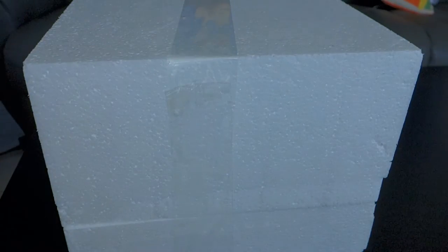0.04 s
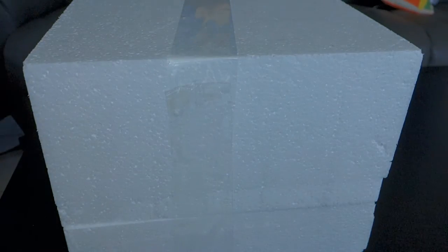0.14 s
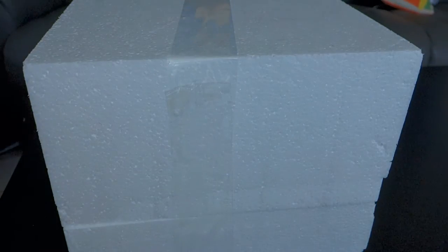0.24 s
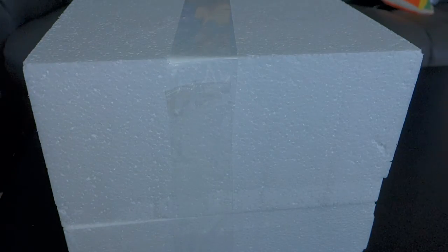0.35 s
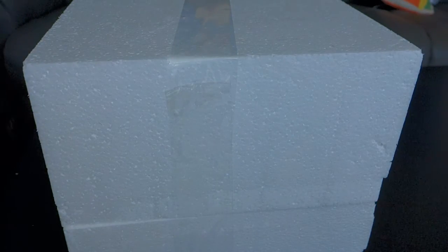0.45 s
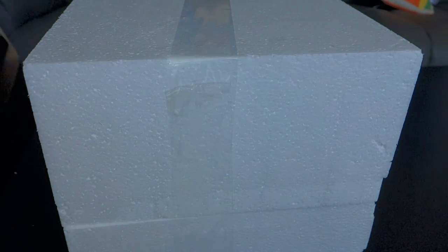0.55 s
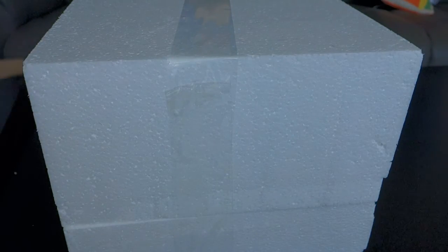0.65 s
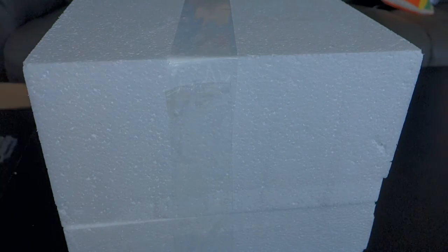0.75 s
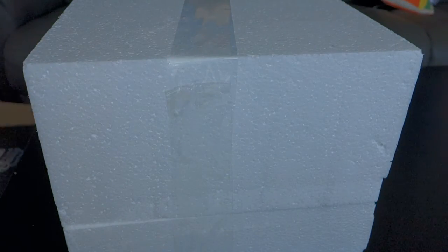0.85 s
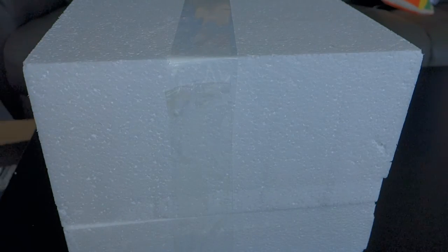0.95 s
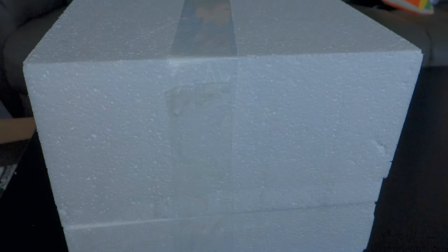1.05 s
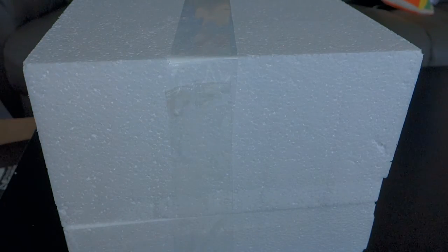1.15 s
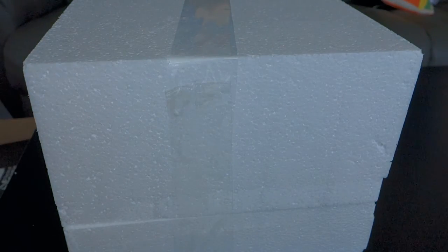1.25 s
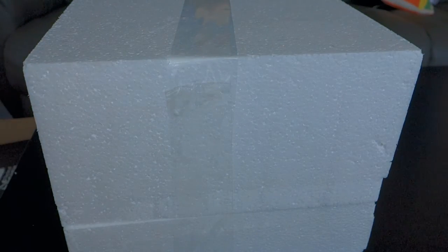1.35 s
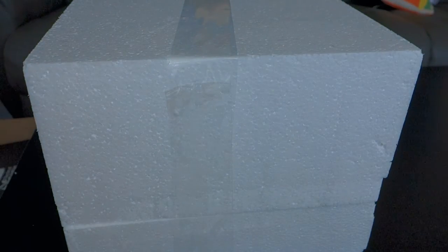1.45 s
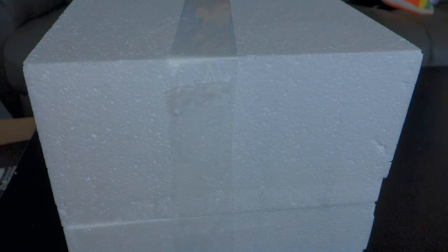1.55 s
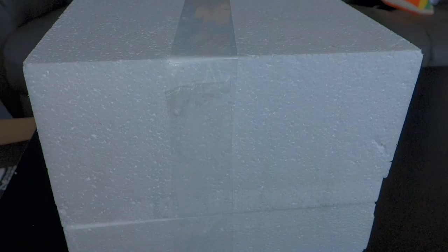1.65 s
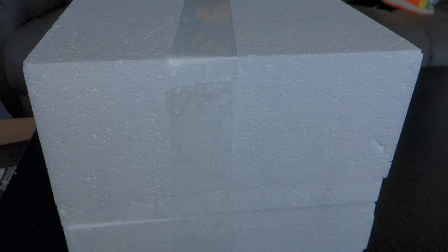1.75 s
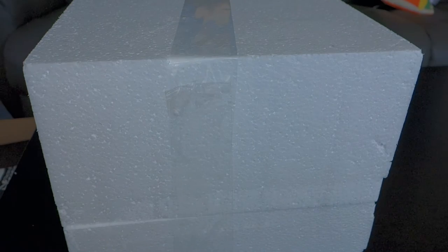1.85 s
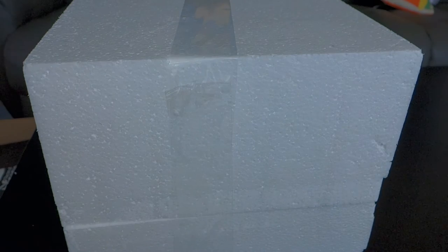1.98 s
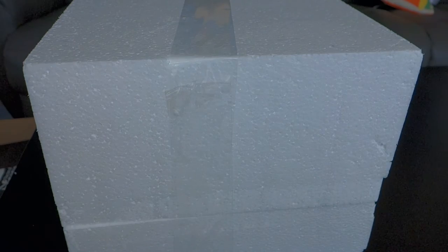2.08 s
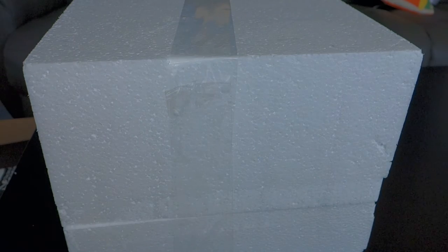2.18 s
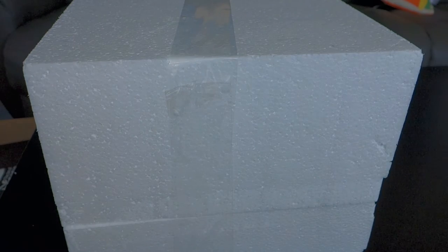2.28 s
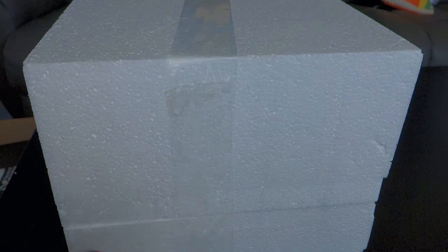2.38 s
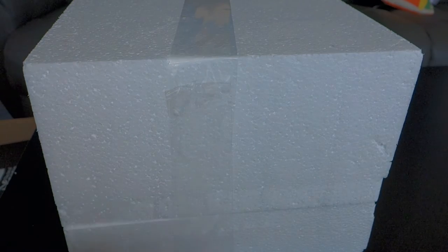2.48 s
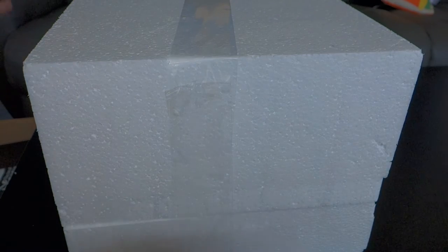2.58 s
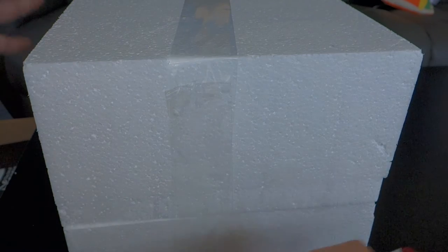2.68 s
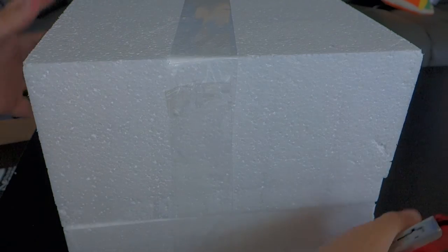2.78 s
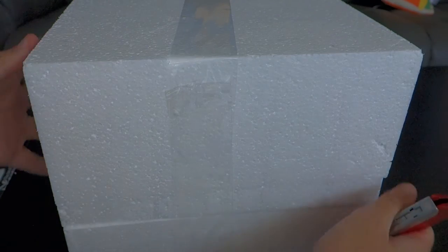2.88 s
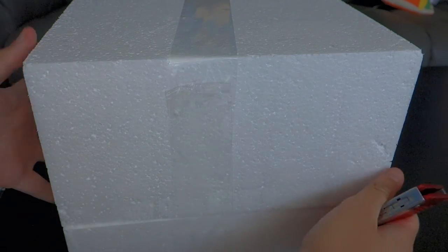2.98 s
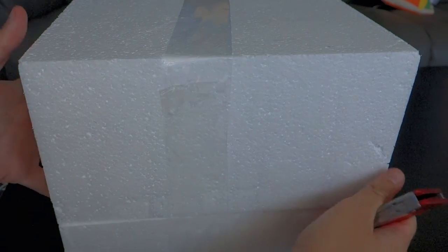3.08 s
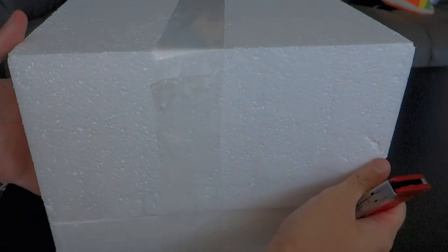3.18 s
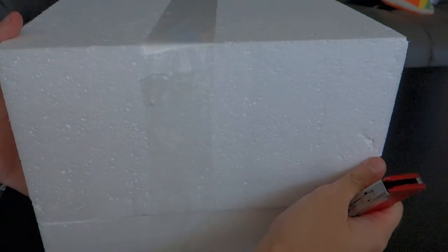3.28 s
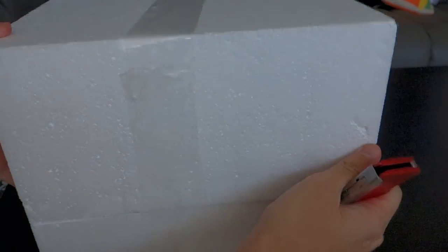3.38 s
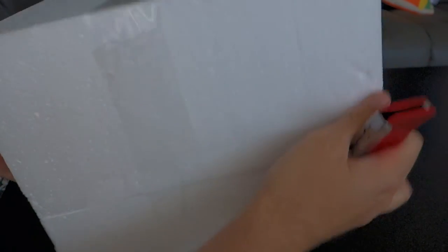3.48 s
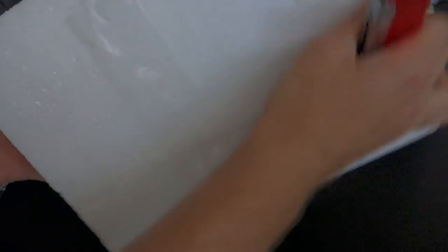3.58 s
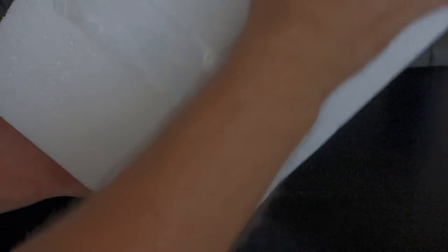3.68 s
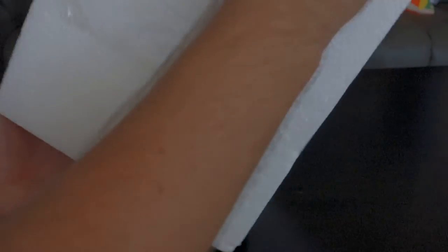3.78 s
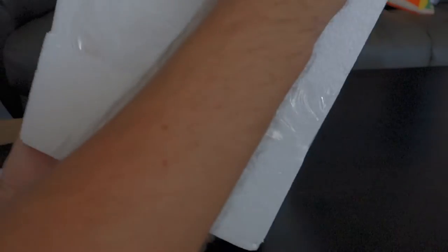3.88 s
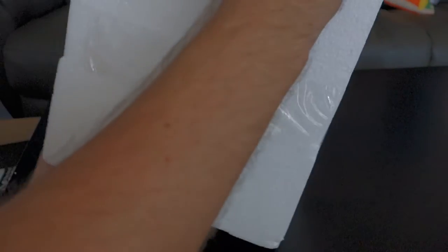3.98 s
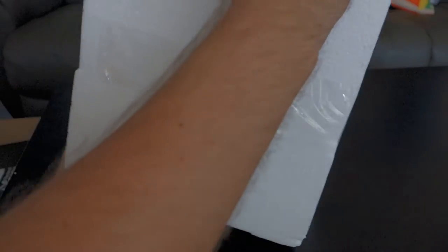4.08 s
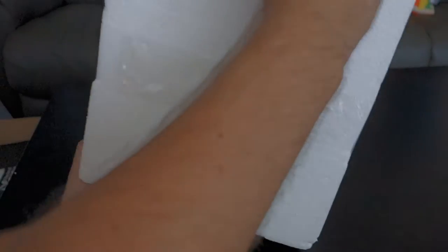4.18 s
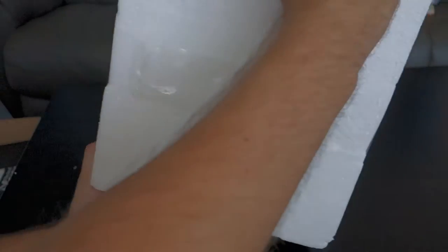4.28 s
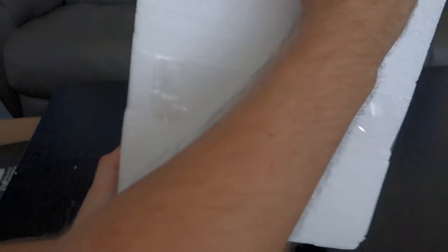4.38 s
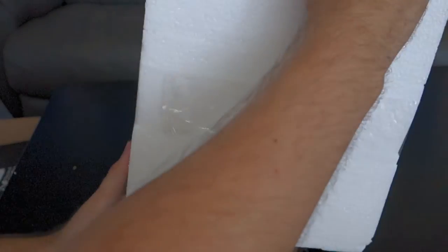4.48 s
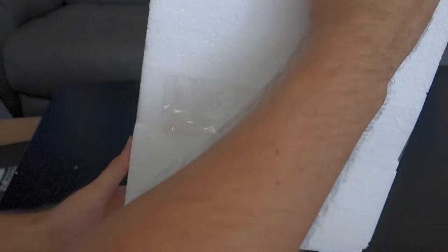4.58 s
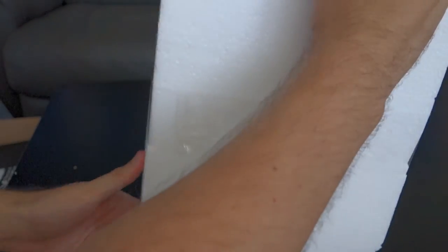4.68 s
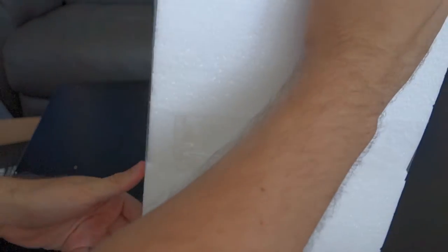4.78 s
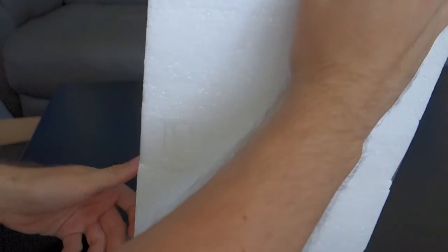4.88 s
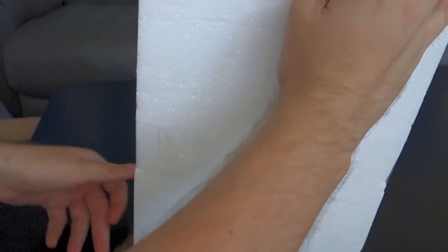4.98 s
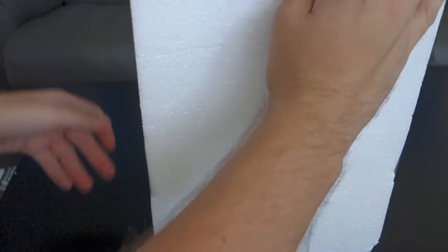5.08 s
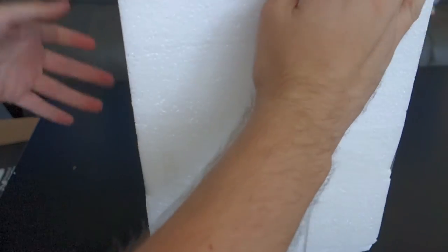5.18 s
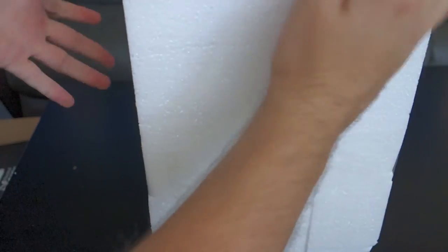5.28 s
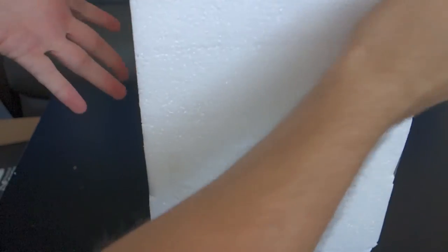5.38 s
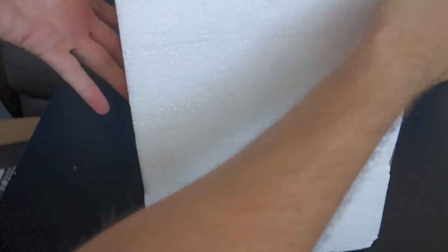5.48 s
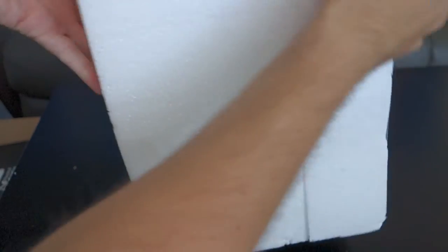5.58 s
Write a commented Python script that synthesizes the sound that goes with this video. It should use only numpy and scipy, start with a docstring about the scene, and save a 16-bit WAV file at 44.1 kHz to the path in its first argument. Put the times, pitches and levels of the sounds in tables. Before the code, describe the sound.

Hollow knocks and light scrapes come from a cardboard box across a small room, ending in one short juddering drag and some faint clicks. Halfway through, the sound moves close to the microphone as hands grip and turn a foam block, with gritty rubbing and crisp little snaps. The block thuds, knocks and squeaks briefly at the end, over quiet room air and a faint fan.

```python
"""Cardboard box and foam block

In a small room, a little way off, a cardboard box is slid, knocked and dragged, so its panels boom
and its surface scrapes; a few light clicks follow. Then, close by, two hands turn a polystyrene
foam block: skin rasps on the beads, and the foam snaps, bumps down and gives a short squeak."""
import sys
import numpy as np
from scipy import signal
from scipy.fft import rfft, irfft, next_fast_len
from scipy.io import wavfile
from scipy.ndimage import uniform_filter1d, map_coordinates

SR = 44100
rng = np.random.default_rng(int(sys.argv[2]) if len(sys.argv) > 2 else 0)


def unload_audio(sound):
    """Save the sound as a 16-bit wav file, at the path given as the first command line argument."""
    columns = np.transpose(np.atleast_2d(sound))
    # keep every value between -1 and 1, then stretch to whole-number steps
    steps = np.round(np.clip(columns, -1, 1) * 32767)
    wavfile.write(sys.argv[1], SR, steps.astype(np.int16))


N = 248724
TIME = np.arange(N) / SR
AGE = np.arange(SR // 2) / SR  # seconds since one short sound began
TOP_HZ = 15900


def amp(db):
    """Turns decibels into a gain."""
    return 10 ** (np.asarray(db) / 20)


def unit(x):
    """Scales a sound to an average level (rms) of 1."""
    return x / np.sqrt(np.mean(x ** 2) + 1e-20)


def even(x):
    """Holds the level near 1 over every thirtieth of a second, keeping the finer texture."""
    return x / np.sqrt(np.abs(uniform_filter1d(x ** 2, size=SR // 30)) + 1e-6 * np.mean(x ** 2))


def along(points, hz):
    """Reads between the rows of a (frequency, value) table, on a log frequency scale."""
    f, values = np.transpose(points)
    return np.interp(np.log(hz + 1), np.log(f + 1), values)


def fade(rows):
    """A gain that follows (t/s, level/dB) rows and is zero outside them."""
    times, db = np.transpose(rows)
    return amp(np.interp(TIME, times, db)) * (TIME >= times[0]) * (TIME <= times[-1])


def add(track, t, sound):
    """Mixes a sound into a track at t seconds."""
    part = track[..., round(t * SR):][..., :sound.shape[-1]]
    part += sound[..., :part.shape[-1]]


def filtered(x, response):
    """Scales each frequency of a sound by response(hz)."""
    size = next_fast_len(x.shape[-1] + SR // 2)
    return irfft(rfft(x, size) * response(np.fft.rfftfreq(size, 1 / SR)), size)[..., :x.shape[-1]]


# How alike left and right are for close and for distant sounds: f/Hz, likeness (1 = the same)
CLOSE = [(60, 0.94), (150, 1), (380, 0.99), (950, 1), (2380, 1), (5980, 0.46), (15000, 0.016)]
DISTANT = [(100, 1), (300, 1), (500, 0.96), (1000, 0.89), (2500, 0.81), (5000, 0.13), (14000, -0.34)]
def spread(pair, likeness):
    """Blends two unrelated signals into left and right with the given likeness."""
    def blend(hz):
        angle = np.arccos(np.clip(along(likeness, hz), -1, 1)) / 2
        return np.array([np.cos(angle), np.sin(angle)])
    mid, side = filtered(pair, blend)
    return np.array([mid + side, mid - side])


def coloured(pair, spectrum, likeness):
    """Gives two noises a tone colour and makes them one stereo sound of level 1."""
    return unit(spread(filtered(pair, lambda hz: amp(along(spectrum, hz))), likeness))


def wobble(rate):
    """A smooth curve through `rate` random points a second."""
    return map_coordinates(rng.standard_normal(int(N * rate / SR) + 4), [TIME * rate])


def friction(rate, rough_db, patchy_db):
    """Tiny slips clump `rate` times a second; their colour drifts as the contact moves."""
    _, _, bands = signal.stft(rng.standard_normal((2, N)), SR, nperseg=512)
    patches = uniform_filter1d(rng.standard_normal(bands.shape[1:]), size=3, axis=0)
    patches = unit(uniform_filter1d(patches, size=14, axis=1))
    pair = signal.istft(bands * amp(patchy_db * patches), nperseg=512)[1][:, :N]
    return pair * amp(rough_db * wobble(rate))


def stroke(length, attack, fall_db_per_s):
    """The gain of one sliding movement: it gathers speed, holds and dies away."""
    return np.clip(AGE / attack, 0, 1) * amp(-fall_db_per_s * np.maximum(AGE - length, 0))


def ring(modes, attack, scatter_db):
    """A struck object rings with its own tones (modes); each fades 60 dB in t60 seconds."""
    tones = sum(amp(db + scatter_db * rng.normal() - 60 * AGE / t60) * np.sin(2 * np.pi * hz * AGE)
                for hz, db, t60 in modes)
    tones *= 1 - np.exp(-AGE / attack)
    return tones / np.abs(tones).max()


def bandpass(x, low_hz, high_hz):
    """Keeps what lies between two frequencies."""
    band = signal.butter(2, [low_hz, min(high_hz, TOP_HZ)], "band", fs=SR, output="sos")
    return signal.sosfilt(band, x)


def burst(t60, band_hz):
    """A puff of noise that peaks at 1 and dies away."""
    puff = bandpass(rng.standard_normal(len(AGE)) * amp(-60 * AGE / t60), *band_hz)
    return puff / np.abs(puff).max()


# How long the room echoes: f/Hz, t60/s
ECHO_TIMES = [(100, 0.46), (300, 0.35), (1000, 0.42), (4000, 0.66), (8000, 0.55), (15000, 0.37)]
def room(x, wet_db):
    """The direct sound plus a wash of echoes from the walls, wet_db beside it in level."""
    hz, t, bands = signal.stft(rng.standard_normal((2, SR * 3 // 4)), SR, nperseg=256)
    tail = signal.istft(bands * amp(-60 * t / along(ECHO_TIMES, hz)[:, None]), SR, nperseg=256)[1]
    tail = spread(np.pad(tail, ((0, 0), (SR // 200, 0))), DISTANT)  # arrives 5 ms late
    tail /= np.linalg.norm(tail[0])
    return x + amp(wet_db) * signal.fftconvolve(np.atleast_2d(x), tail, axes=1)[:, :N]


# Tone colour of the room's air: f/Hz, level/dB
AIR_COLOUR = [(20, -2.5), (50, -12.5), (81, -11), (127, -10.5), (200, -5.5), (310, -13.5), (450, -14.5),
              (700, -17), (1400, -20), (2600, -28), (6000, -34.5), (16000, -38)]
def background(fan_hz=204):
    """Quiet room air, the wavering hum of a fan and a low rumble while the block is handled."""
    air = coloured(rng.standard_normal((2, N)), AIR_COLOUR, DISTANT)
    hum = unit(filtered(rng.standard_normal(N), lambda hz: 1 / (1 + ((hz - fan_hz) / 4) ** 2)))
    rumble_colour = [(45, -45), (80, 4), (115, -14), (200, -6), (500, -67)]
    rumble = coloured(rng.standard_normal((2, N)), rumble_colour, DISTANT)
    handling = fade([(2.9, -64), (3.6, -71), (4.4, -59), (5.64, -61)])
    return amp(-55.5) * air + amp(-61) * hum + handling * rumble


# Light clicks across the room: t/s, level/dB
CLICK_TIMES = [(1.618, -49), (1.713, -47), (1.944, -39.5), (2.068, -46), (2.077, -42.5), (2.132, -49),
               (2.7395, -32.5)]
# Where the clicking parts ring: f/Hz, width/Hz, level/dB
CLICK_BANDS = [(2550, 260, -12.5), (3810, 400, -8.5), (4950, 910, -5.5), (6750, 1400, -6)]
def clicking():
    """Small hard parts click, and the room rings on after them."""
    track = np.zeros(N)
    for t, db in CLICK_TIMES:
        tick = amp(-0.5) * burst(t60=0.0056, band_hz=(2530, 9800))
        shell = sum(amp(level) * burst(t60=0.013, band_hz=(hz - width / 2, hz + width / 2))
                    for hz, width, level in CLICK_BANDS)
        add(track, t, amp(db) * (tick + shell))
    return room(track, wet_db=-3.5) * amp([[1], [-1]])  # a little to the left


# Light slides of the box: t/s, length/s, panel level/dB, hiss level/dB
BOX_SLIDES = [(0.0, 0.043, -45.5, -54), (0.112, 0.049, -41, -54.5), (0.175, .18, -46, -58),
              (0.468, 0.091, -53, -52), (0.513, 0.026, -42.5, -59), (0.583, 0.016, -41, -50),
              (0.635, 0.53, -51, -62.5), (0.81, 0.02, -47, -67), (1.183, 0.18, -63, -66.5),
              (1.57, 0.15, -55.5, -68), (1.616, 0.03, -46.5, -66), (1.727, 0.034, -60, -48.5),
              (1.76, 0.039, -75, -57)]
# Tone colours of its panels and its surface: f/Hz, level/dB
PANEL_COLOUR = [(53, -29), (90, -16), (196, -2), (226, 1), (358, 0.5), (440, -3), (743, -2), (958, -9),
                (1040, -6.5), (1570, -11), (1990, -10), (2730, -18), (4000, -19.5), (5200, -55),
                (8800, -120)]
HISS_COLOUR = [(1290, -47), (2200, -7), (3200, -2), (4640, -0.5), (7000, -1.5), (12100, -7.5), (15000, -11),
               (16000, -17)]
def box_sliding():
    """Cardboard slides lightly: its panels murmur and its surface hisses."""
    power = np.zeros((2, N))
    for t, length, panel_db, hiss_db in BOX_SLIDES:
        swell = stroke(length, attack=0.012, fall_db_per_s=225)
        add(power, t, (amp([[panel_db], [hiss_db]]) * swell) ** 2)
    panel_gain, hiss_gain = np.sqrt(power)
    murmur = panel_gain * coloured(friction(rate=90, rough_db=1.5, patchy_db=1), PANEL_COLOUR, DISTANT)
    hiss = hiss_gain * coloured(friction(rate=200, rough_db=1.5, patchy_db=1), HISS_COLOUR, DISTANT)
    return room(amp(-0.5) * murmur + amp(1) * hiss, wet_db=-4) * amp([[0.6], [-0.6]])


# Knocks on the box: t/s, level/dB, hardness/dB
BOX_KNOCKS = [(0.1191, -32.5, 0.5), (0.246, -12, -10.5), (0.412, -35.5, -7), (0.547, -39.5, 4),
              (0.744, -33.5, 4), (0.842, -33.5, -8), (1.187, -26, -17)]
# Tones of the struck box: f/Hz, level/dB, t60/s
BOX_MODES = [(169, -12, 0.24), (232.7, -13, 0.3), (296.3, 0.5, 0.091), (326.4, 4.5, 0.14), (419, 6, 0.077),
             (500, -31, 0.065), (720, 3, 0.066), (766, -16, 0.14)]
def box_knocking():
    """Dull knocks ring the box panels, and the loose flaps shake on briefly."""
    track = np.zeros(N)
    for t, db, hard_db in BOX_KNOCKS:
        panels = ring(BOX_MODES, attack=0.0007, scatter_db=1)
        flaps = amp(-14.5) * burst(t60=0.29, band_hz=(216, 800))
        tap = amp(hard_db) * burst(t60=0.016, band_hz=(457, 1010))
        add(track, t, amp(db) * (panels + flaps + tap))
    return room(amp(-2) * track, wet_db=-2)


# Where the dragged box booms: f/Hz, width/Hz, level/dB
PANEL_BANDS = [(83.4, 34, -15.5), (129, 23, -9), (174, 35, -19), (208.6, 20, 0.5), (246, 52, 0),
               (296, 43, -2), (335.4, 21, 3.5), (413, 53, -6), (506, 17, -6), (555, 50, -13),
               (648, 31, -13.5)]
def panel_response(hz):
    """The panels move most when shaken near their own frequencies."""
    return sum((-1) ** k * amp(db) * 1j * hz * width / (centre ** 2 - hz ** 2 + 1j * hz * width)
               for k, (centre, width, db) in enumerate(PANEL_BANDS))


# The course of one short drag: t/s, boom level/dB, scrape level/dB
DRAG_LEVELS = [(0.958, -23.5, -32.5), (0.975, -21, -33.5), (1.01, -23, -36), (1.027, -19.5, -28),
               (1.06, -20, -29.5), (1.1, -22, -33), (1.135, -31, -43)]
# Tone colour of the scrape: f/Hz, level/dB
SCRAPE_COLOUR = [(380, -14), (650, -10), (686, -4.5), (1550, -11), (2390, -16), (2590, -18.5), (2840, -21),
                 (3970, -27.5), (7260, -32), (12900, -40.5), (16000, -47)]
def box_dragging(start=0.955, stop=1.15, slips_per_s=140, slip_t60=0.048):
    """The box breaks loose with a crack and judders; each slip shakes the panels and scrapes."""
    moving = np.interp(TIME, [start, start + 0.003, stop - 0.01, stop], [0, 1, 1, 0])
    times, *levels = np.transpose(DRAG_LEVELS)
    boom_gain, scrape_gain = [moving * amp(np.interp(TIME, times, db)) for db in levels]
    gaps = np.exp(0.35 * rng.standard_normal(60)) / slips_per_s
    sizes = amp(2 * rng.standard_normal(60))
    slips = np.zeros(N)
    for t, size in zip(start + np.cumsum(gaps) - gaps[0], sizes):
        add(slips, t, size * amp(-60 * AGE / slip_t60))
    boom = boom_gain * even(filtered(slips * rng.standard_normal(N), panel_response))
    jolt = amp(-18.5) * ring(BOX_MODES, attack=0.00064, scatter_db=1.5)
    crack = amp(-24.5) * burst(t60=0.031, band_hz=(610, 2600))
    add(boom, start + 0.00198, jolt + crack)
    scrape = scrape_gain * even(slips) * coloured(rng.standard_normal((2, N)), SCRAPE_COLOUR, DISTANT)
    return room(amp(-0.5) * boom, wet_db=-3.5) + room(scrape, wet_db=-0.5) * amp([[1.2], [-1.2]])


# Bumps of the foam block: t/s, thud level/dB, rap level/dB
FOAM_BUMPS = [(4.427, -35, -38), (5.143, -14.5, -42), (5.504, -27, -21.5)]
# Tones of a soft and of a hard landing: f/Hz, level/dB, t60/s
THUD_MODES = [(129, -7, .14), (188, 0, .06), (250, -4, .035)]
RAP_MODES = [(240, -8, 0.081), (330, -12, 0.029), (440, 4.5, 0.022), (520, -9, 0.061), (690, -18, 0.019),
             (1270, -9.5, 0.031)]
def foam_bumping():
    """The block lands with a soft thud or a harder rap; the table under it sways briefly."""
    track = np.zeros(N)
    for t, thud_db, rap_db in FOAM_BUMPS:
        sway = amp(-32) * ring([(37.3, 0, 0.49)], attack=0.23, scatter_db=0)
        thud = ring(THUD_MODES, attack=0.0012, scatter_db=1)
        shake = amp(-9) * burst(t60=0.37, band_hz=(245, 624))
        shake += amp(-9.5) * burst(t60=0.12, band_hz=(700, 4000))
        rap = ring(RAP_MODES, attack=0.0012, scatter_db=3.5)
        add(track, t, amp(thud_db) * (thud + sway) + amp(rap_db) * (rap + shake))
    return room(track, wet_db=-11)


def foam_squeak(pitch_hz=1850, waver=0.016):
    """The fingers catch on the foam and slip at a wavering pitch."""
    phase = 2 * np.pi * np.cumsum(pitch_hz * (1 + waver * wobble(400))) / SR
    tone = np.sin(phase) + amp(-4) * np.sin(2 * phase) + amp(-5) * np.sin(3 * phase)
    return tone * fade([(5.605, -50), (5.622, -42), (5.64, -32)])


# Snaps of the foam beads: t/s, level/dB, f/Hz
BEAD_SNAPS = [(3.0306, -34, 7170), (3.7568, -11, 4370), (3.763, -15.5, 4000), (3.8315, -26, 9000),
              (3.8748, -22, 4900), (4.1034, -16, 3940), (4.244, -28, 2960), (4.2584, -12.5, 5400),
              (4.3302, -23, 2440), (4.3305, -23.5, 7400), (4.8004, -19, 3520), (5.0403, -17.5, 4300),
              (5.106, -31.5, 2120), (5.207, -19.5, 3370), (5.502, -17, 4100)]
def foam_snapping(rise_s=0.0026):
    """A bead lets go with a snap of a few milliseconds, and its neighbours follow."""
    track = np.zeros((2, N))
    for t, db, hz in BEAD_SNAPS:
        snap = np.array([burst(t60=0.037, band_hz=(hz * 0.69, hz * 1.45)) for _ in range(2)])
        snap *= np.exp(-(AGE / rise_s - 1) ** 4)
        neighbours = np.array([burst(t60=0.04, band_hz=(1500, 10000)) for _ in range(2)])
        add(track, t, amp(db) * (snap / np.abs(snap).max() + amp(-13) * neighbours))
    return room(amp(-5) * spread(track, likeness=[(3000, 0.99), (10000, 0.35)]), wet_db=-12)


# Tone colour of catching beads: f/Hz, level/dB
CRACKLE_COLOUR = [(900, -48), (2000, -7), (4500, 7), (8000, -7), (16000, -19)]
def bead_crackle(catches_per_s=260, scatter_db=1.5):
    """Single beads catch and let go at random."""
    caught = rng.random(N) < catches_per_s / SR
    sizes = amp(scatter_db * np.clip(rng.standard_normal(N), -2, 2))
    grain = rng.standard_normal((2, SR // 500)) * np.exp(-AGE[:SR // 500] / 0.00023)
    spikes = signal.fftconvolve((caught * sizes)[None], np.abs(grain), axes=1)[:, :N]
    return coloured(spikes * rng.standard_normal((2, N)), CRACKLE_COLOUR, CLOSE)


# Slips of the grip: t/s, scuff level/dB, block level/dB, length/s
GRIP_SLIPS = [(2.992, -41, -51, 0.023), (3.139, -37, -44, 0.037), (3.215, -35, -45, 0.02),
              (3.634, -42.5, -42, 0.067), (3.71, -34.5, -49, 0.03), (4.479, -41, -37.5, 0.016),
              (4.5, -32, -49, 0.012), (5.341, -35.5, -41.5, 0.016), (5.541, -33.5, -42.5, 0.017)]
# Tone colours of the scuff and of the block: f/Hz, level/dB
SCUFF_COLOUR = [(200, 4), (700, -32), (1600, 8.5), (6000, 2), (12000, 1), (16000, -6.5)]
BLOCK_COLOUR = [(60, -50), (150, -14), (280, -1), (400, 0), (750, -7), (1200, -8), (2200, -25)]
def grip_slipping():
    """The grip slips briefly with a scuff and stirs the hollow block."""
    gains = np.zeros((2, N))
    for t, scuff_db, block_db, length in GRIP_SLIPS:
        swell = (1 - np.exp(-AGE / 0.002)) * np.exp(-(AGE / length) ** 4)
        add(gains, t, amp([[scuff_db], [block_db]]) * swell)
    scuff = coloured(friction(rate=900, rough_db=3, patchy_db=2.5), SCUFF_COLOUR, CLOSE)
    block = coloured(friction(rate=400, rough_db=1.5, patchy_db=2), BLOCK_COLOUR, CLOSE)
    return gains[0] * scuff + gains[1] * block


def patch_ringing(hz, sharpness=7):
    """The patch of foam under the fingers rings around one pitch."""
    half_width = hz / sharpness / 2
    return unit(bandpass(rng.standard_normal((2, len(AGE))), hz - half_width, hz + half_width))


def rub_gains(db, bright_db):
    """Gains of rasp, grit and fizz: a brighter rub trades rasp for fizz."""
    return amp(db + np.array([[-2.1 - bright_db], [1], [3 + 0.86 * bright_db]]))


# The hands creep on the foam for as long as they hold it: t/s, level/dB
HAND_CREEP = [(2.97, -55.5), (3.1, -50.5), (3.57, -57.5), (3.85, -49.5), (3.94, -55.5), (4.14, -50.5),
              (4.22, -54), (4.83, -47), (5.26, -46.5), (5.48, -59), (5.58, -47.5), (5.64, -53)]
# Strokes of the hands: t/s, length/s, level/dB, brightness/dB, ringing f/Hz
HAND_STROKES = [(2.953, 0.021, -58.5, 11.5, 7000), (2.986, 0.033, -45, 5, 1470),
                (3.158, 0.092, -43.5, -2, 4700), (3.227, .13, -45, -1, 4480),
                (3.402, 0.07, -51, -3.5, 4750), (3.455, 0.077, -46.5, 7.5, 4400),
                (3.582, 0.11, -49.5, -2, 4270), (3.701, 0.059, -40, 1, 1820), (3.796, 0.038, -45, 1, 4180),
                (3.96, 0.093, -41, 6, 1330), (4.05, 0.045, -47.5, 5.5, 5290),
                (4.263, 0.052, -47, -4.5, 2400), (4.366, 0.063, -41.5, 0, 2720),
                (4.406, 0.068, -37, 2, 2740), (4.458, 0.074, -36.5, -0.5, 4600),
                (4.54, 0.1, -43.5, -1.5, 1110), (4.614, 0.03, -37, -3.5, 1004),
                (4.632, 0.097, -40.5, 1.5, 3710), (4.722, 0.073, -37, 2, 3540),
                (4.84, 0.088, -41.5, 0, 1540), (4.915, 0.093, -39.5, 3, 1120),
                (5.018, 0.15, -44.5, -2, 4760), (5.08, .08, -40, 2, 2040), (5.156, 0.034, -44.5, -1, 3280),
                (5.265, 0.13, -52, 1.5, 990), (5.608, 0.075, -36.5, 1, 4180)]
# Tone colours of the low, middle and high parts of the rubbing: f/Hz, level/dB
RASP_COLOUR = [(150, -14), (260, -1.5), (324, -2), (355, -4), (388, -6), (449, -9.5), (630, -3.5),
               (729, -5.5), (1260, 0), (1530, -1), (2300, -1), (2990, -10.5), (5060, -120)]
GRIT_COLOUR = [(1350, -21.5), (2300, -2.5), (3200, 1.5), (3800, 3.5), (4190, 0.5), (4560, 3), (5170, -1.5),
               (5680, 2.5), (7000, -2.5), (9100, -27), (15400, -120)]
FIZZ_COLOUR = [(4120, -21.5), (7000, -2), (12600, -5), (15100, -13), (16000, -6.5)]
def foam_rubbing():
    """Skin drags over foam beads: coarse rasp, grit, fine fizz and crackle tremble with the grip."""
    power = (rub_gains(0, bright_db=-2) * fade(HAND_CREEP)) ** 2
    ringing = np.zeros((2, N))
    for t, length, db, bright_db, hz in HAND_STROKES:
        swell = stroke(length, attack=0.45 * length, fall_db_per_s=361)
        add(power, t, (rub_gains(db, bright_db) * swell) ** 2)
        add(ringing, t, amp(db - 5.5) * swell * patch_ringing(hz))
    rasp_gain, grit_gain, fizz_gain = np.sqrt(power)
    rasp = rasp_gain * coloured(friction(rate=420, rough_db=1, patchy_db=0), RASP_COLOUR, CLOSE)
    grit = grit_gain * coloured(friction(rate=570, rough_db=1.5, patchy_db=0.5), GRIT_COLOUR, CLOSE)
    fizz = fizz_gain * coloured(friction(rate=1700, rough_db=2, patchy_db=2), FIZZ_COLOUR, CLOSE)
    crackle = grit_gain * amp(-9) * bead_crackle()
    hands = rasp + grit + fizz + crackle + spread(ringing, CLOSE) + grip_slipping()
    tremble = amp(0.64 * wobble(70))
    return room(hands * tremble, wet_db=-10) * amp([[0.5], [-0.5]])


def scene():
    """Cardboard across the room, then foam close by."""
    distant = background() + clicking() + box_sliding() + box_knocking() + box_dragging()
    return distant + foam_bumping() + foam_squeak() + foam_snapping() + foam_rubbing()


# How far the microphone's left side runs ahead of its right: f/Hz, lead/radians
LEFT_LEAD = [(60, -.04), (200, -0.15), (400, -0.31), (700, -0.36), (1500, -0.53), (3000, -0.74),
             (8000, 0.51)]
def record(dry, bass_hz=62):
    """The microphone thins the deep bass, cuts the highest treble and sets its sides out of step."""
    def response(hz):
        lead = np.exp(0.5j * np.outer([1, -1], along(LEFT_LEAD, hz)))
        bass_cut = -hz ** 2 / (bass_hz ** 2 - hz ** 2 + 1j * np.sqrt(2) * bass_hz * hz)
        return lead * bass_cut * (hz < TOP_HZ)
    return filtered(dry, response)


dry = scene()
out = record(dry)
unload_audio(out)
```